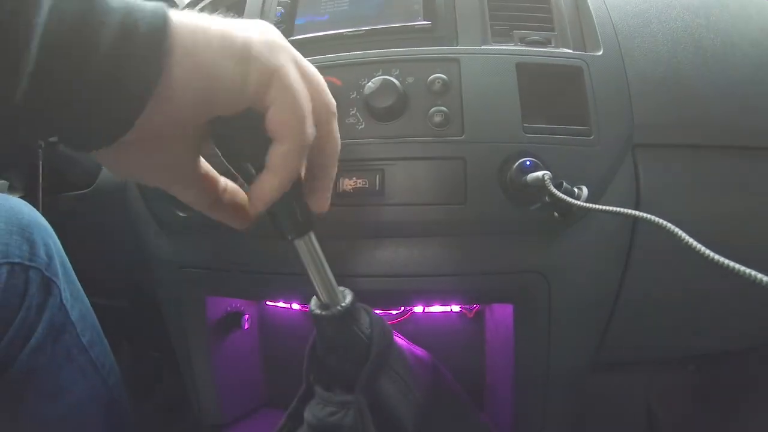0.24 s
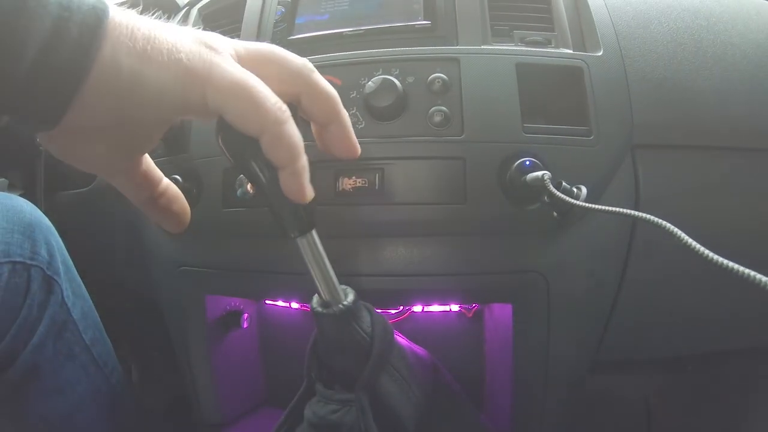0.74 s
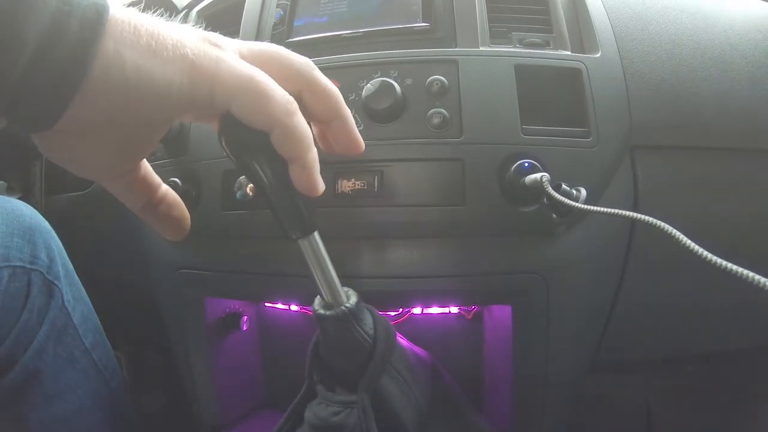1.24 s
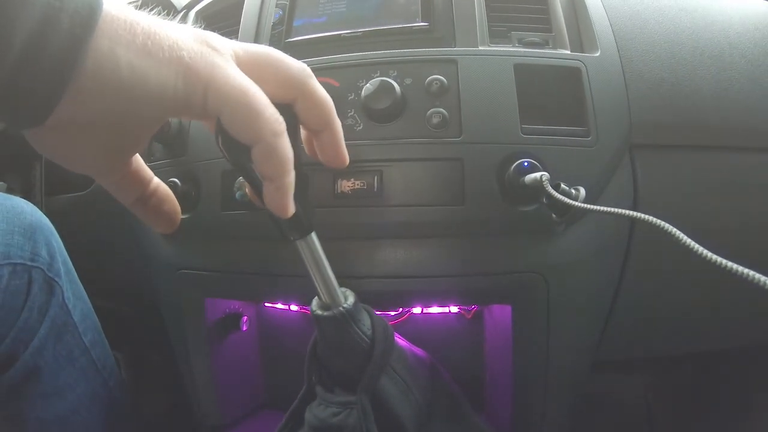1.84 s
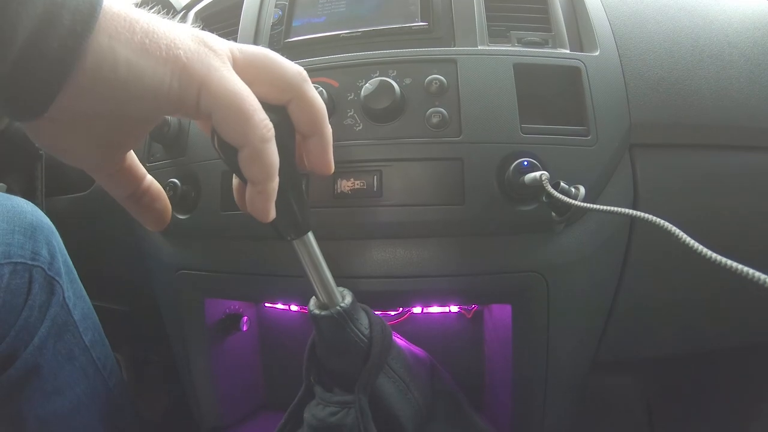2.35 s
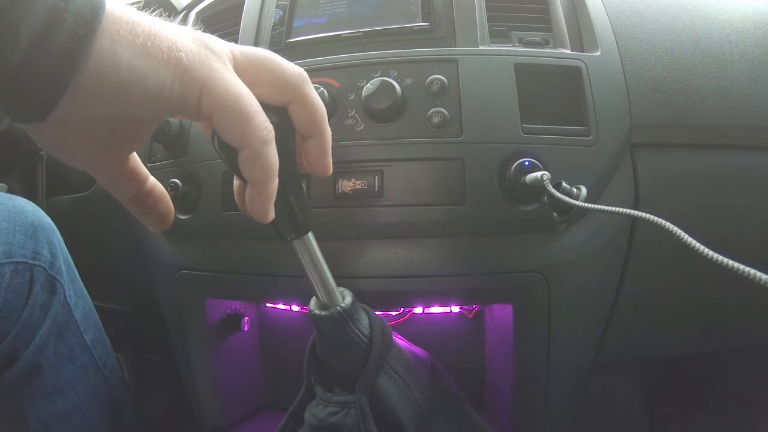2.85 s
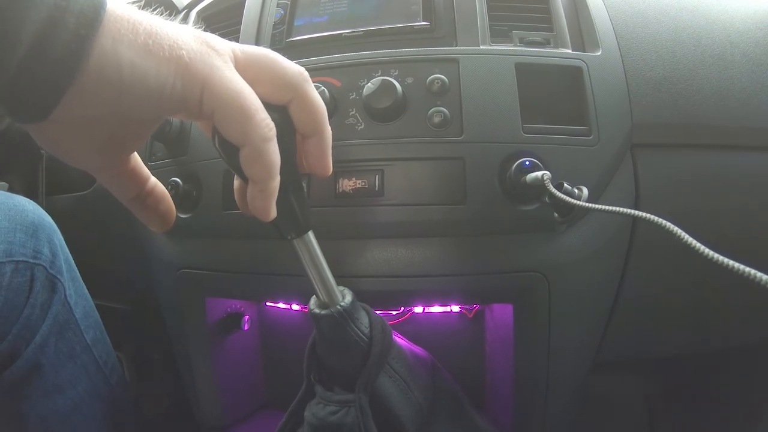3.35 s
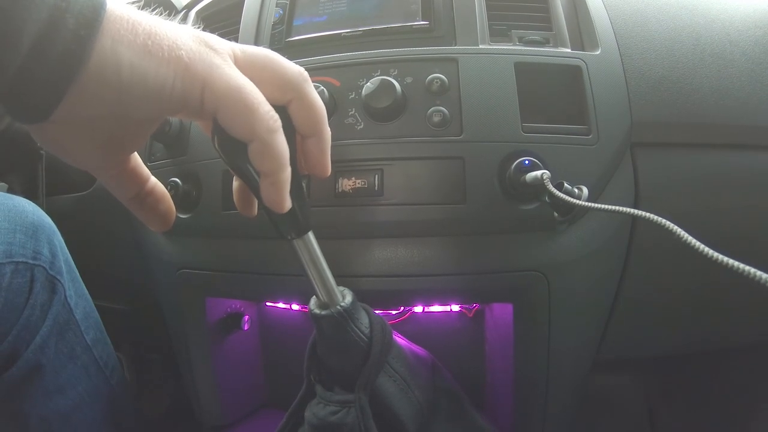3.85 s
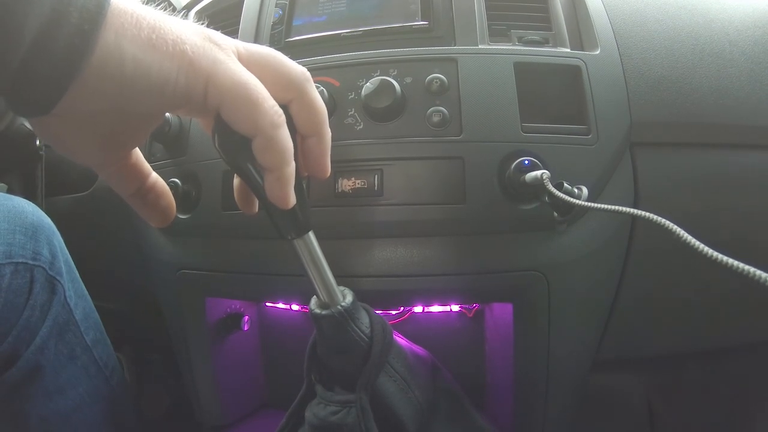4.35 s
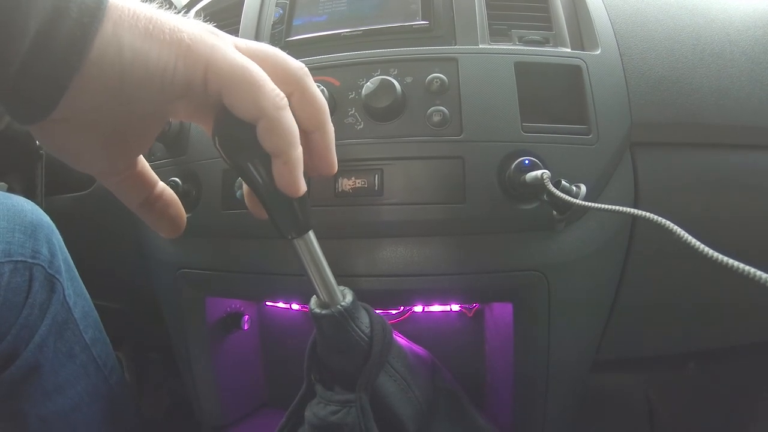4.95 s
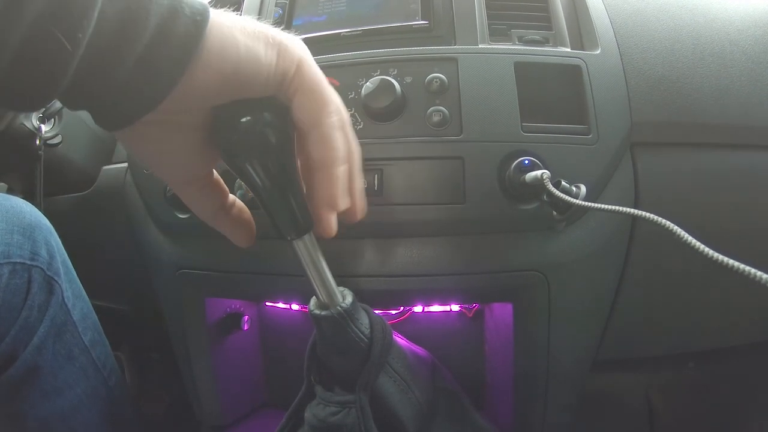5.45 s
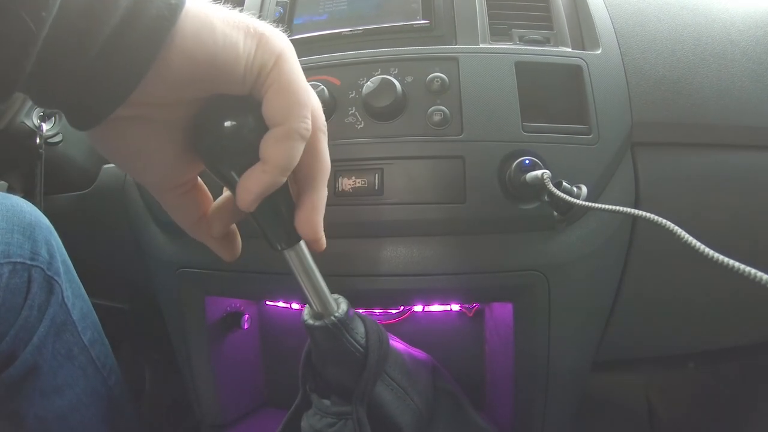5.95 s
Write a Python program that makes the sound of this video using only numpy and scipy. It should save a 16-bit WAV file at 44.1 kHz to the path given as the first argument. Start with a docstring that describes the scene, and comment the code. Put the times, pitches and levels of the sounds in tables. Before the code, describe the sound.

Sharp gearshift knocks, falling diesel revs, a brief rough surge with breathy turbo and lever rattle, then a long low rumbling coast in the cab.

```python
"""A six-cylinder diesel heard from inside the cab of a moving pickup: the clutch comes up after a shift, the
engine pulls briefly while the turbo spools, then the truck coasts. Crank-order tones and pulsing noise make the
engine, moving noise bands the turbo. Tyres drone from noise that repeats each turn and tick once a turn, the cab
booms on one low tone, gears hum, the lever knocks and rattles on its ringing modes, trim buzzes, air hisses past."""
import sys
import numpy as np
from scipy import signal
from scipy.fft import rfft, irfft
from scipy.io import wavfile
from scipy.ndimage import uniform_filter1d

SR = 44100
rng = np.random.default_rng(int(sys.argv[2]) if len(sys.argv) > 2 else 0)


def bounce(signal):
    """Save signal as a 16-bit WAV file at the path given by the first command-line argument."""
    frames = np.transpose(np.atleast_2d(signal))
    limited = np.clip(frames, -1, 1)
    pcm = np.round(limited * 32767).astype(np.int16)
    wavfile.write(sys.argv[1], SR, pcm)


N = 273420
t = np.arange(N) / SR
TOP_HZ = 15700  # the microphone passes nothing much above this

# Engine effort: (time [s], firing throb level [dB], combustion load [dB], 0 = full load)
ENGINE_EFFORT = [(0, -31.5, -23.5), (.2, -27.5, -14), (.38, -28.5, -19), (.48, -37, -19.5),
                 (.65, -32.5, -19), (.85, -28, -16.5), (1.05, -26.5, -8), (1.35, -22, -1),
                 (1.78, -24.5, -1.5), (1.9, -25.5, -16), (2.1, -29, -21), (2.4, -29.5, -16),
                 (2.7, -41, -21), (4.2, -36, -23.5), (6.2, -38.5, -41)]
# Cab panel resonances: (frequency [Hz], width [Hz], boost [dB])
PANEL_MODES = [(1174, 120, 2.5), (2278, 79, 5)]
# Rush of charge air, which the lever rattle follows: (time [s], level [dB])
CHARGE_AIR = [(0, -55), (.4, -66), (.6, -70), (1.0, -52), (1.5, -58), (1.8, -49), (2.15, -50.5), (2.4, -62),
              (2.8, -90)]
# Ringing modes of the gear lever: (frequency [Hz], relative level [dB], 60 dB decay time [s])
LEVER_MODES = [(2305, -1, 0.06), (3007, -10, 0.022), (3990, -14, 0.037), (4520, -12.5, 0.05),
               (5480, -14, 0.027)]


def undb(db):
    """Turn decibels into an amplitude factor."""
    return 10 ** (np.asarray(db) / 20)


def columns(table):
    """Table columns joined by straight lines in time."""
    s, *rest = np.transpose(table)
    return [np.interp(t, s, c) for c in rest]


def unit(x):
    """Scale to rms 1."""
    return x / np.sqrt(np.mean(x ** 2))


def colour(x, shape, peaks=()):
    """Filter to a (frequency [Hz], level [dB]) outline with resonances on top; rms 1."""
    f = np.maximum(np.fft.rfftfreq(len(x), 1 / SR), 1)
    outline_hz, outline_db = np.transpose(shape)
    db = np.interp(np.log(f), np.log(outline_hz), outline_db, left=-120, right=-120)
    for hz, width, boost_db in peaks:
        db = db + boost_db / (1 + (2 * (f - hz) / width) ** 2)
    return unit(irfft(rfft(x) * undb(db), len(x)))


def walk(rate):
    """Wandering random values: drawn rate times a second, held, then smoothed twice; spread near 1."""
    hold = int(SR / rate)
    steps = np.repeat(rng.standard_normal(N // hold + 1), hold)
    return 1.27 * uniform_filter1d(uniform_filter1d(steps, hold), hold)[:N]


def tone(turns, drift=0.076, rate=6):
    """A sine on a running count of cycles, its phase wandering by drift cycles; rms near 1."""
    return np.sqrt(2) * np.sin(2 * np.pi * (turns + rng.random() + drift * walk(rate)))


def breath(hz, spread_hz):
    """Noise in a narrow band around a moving centre; rms 1."""
    at = np.cumsum(spread_hz * np.ones(N)) / SR
    steps = np.arange(int(at[-1]) + 2)
    # a wider band draws its random values faster
    a, b = (np.interp(at, steps, rng.standard_normal(len(steps))) for _ in range(2))
    phase = 2 * np.pi * np.cumsum(hz * np.ones(N)) / SR
    return unit(a * np.cos(phase) + b * np.sin(phase))


def repeating(turns):
    """A fixed random pattern played once a turn; rms 1."""
    size = 4096
    pattern = rng.standard_normal(size)
    return unit(np.interp(turns % 1, np.arange(size) / size, pattern, period=1))


def swells(rows):
    """Bell-shaped rises and falls from (peak [s], rise [s], fall [s], level [dB]) rows."""
    return sum(undb(db) * np.exp(-(2 * (t - s) / np.where(t < s, rise, fall)) ** 2) for s, rise, fall, db in rows)


def half_sine(start, end):
    """A single arch from start to end [s], silent outside."""
    return np.sin(np.pi * np.clip((t - start) / (end - start), 0, 1))


def engine(firing_hz, slip):
    """Crank orders through the mounts; load brings higher orders and a roar that pulses with each firing."""
    # Throb through the mounts: (crank order, relative level [dB])
    throb_orders = [(1, -15.5), (1.5, -17.5), (2, -7.5), (3, -2.5), (4.5, -12)]
    # Orders raised by load: (crank order, level at full load [dB])
    pull_orders = [(6, -19.5), (9, -34.5), (10.5, -30.5), (13, -41.5), (15, -39), (18.5, -40.5),
                   (22.5, -42.5), (26.5, -43.5), (30, -46), (33, -40.5), (35.5, -51), (38, -67),
                   (44, -46.5)]
    # Roar outline: (frequency [Hz], relative level [dB])
    roar_outline = [(120, -43), (200, -8), (223, -20), (376, -15), (494, -22), (581, -24.5), (833, -14),
                    (896, -27.5), (1050, -20), (1950, -32.5), (2290, -33.5), (3230, -42.5), (5260, -38),
                    (9720, -51.5), (15000, -76)]
    throb_db, load_db = columns(ENGINE_EFFORT)
    firings = np.cumsum(firing_hz) / SR
    crank = firings / 3  # six cylinders fire three times a crank turn

    throb = sum(undb(db + 1.2 * walk(8.9)) * tone(k * crank) for k, db in throb_orders)
    # with the clutch down the free-running engine rocks harder and rougher on one order
    rocking = undb(2.2 * walk(23.8)) * tone(9 / 2 * crank, drift=0.11, rate=25)
    throb = throb + 1.5 * (slip - 1) * rocking

    # higher orders waver more
    pull = sum(undb(db + 0.1 * k * walk(14)) * tone(k * crank, drift=0.011 * k, rate=14) for k, db in pull_orders)

    firing_pulse = 1 + 0.33 * np.cos(2 * np.pi * firings)
    # valve gear and knock repeat every two crank turns
    cycle = repeating(crank / 2 + .0004 * walk(12))
    roar = colour(firing_pulse * rng.standard_normal(N) + 0.53 * cycle, roar_outline, PANEL_MODES)
    roar_db = -32 + 0.55 * load_db
    return undb(throb_db) * throb + undb(load_db) * pull + undb(roar_db) * roar


def turbo():
    """A breathy whistle, broadest under load, with a faint octave and a flickering rush of charge air."""
    # Whistle: (time [s], centre frequency [Hz], level [dB])
    whistle_path = [(0, 7860, -68), (.15, 7657, -63), (.3, 7380, -66), (.5, 6800, -68), (.9, 6600, -67),
                    (1.2, 7540, -69), (1.5, 9210, -61), (1.75, 10300, -58.5), (1.9, 10450, -70),
                    (2.3, 8500, -76), (2.45, 7700, -64), (2.7, 6901, -63.5), (3, 6290, -65),
                    (3.5, 5753, -61), (4, 5400, -63), (4.4, 5250, -72.5), (6.2, 5000, -80)]
    # Charge air outline: (frequency [Hz], relative level [dB])
    rush_outline = [(3000, -21.5), (4300, -1), (5300, 0), (6500, -6.5), (8500, -11), (10600, -15.5),
                    (10900, -25), (14000, -30.5)]
    hz, db = columns(whistle_path)
    load = undb(columns(ENGINE_EFFORT)[1])
    spread_hz = .06 * hz + 900 * load
    # the octave sounds only where it stays below the microphone's top
    octave = undb(-23) * (hz < TOP_HZ / 2) * breath(2 * hz, 2 * spread_hz)
    whistle = undb(db + 2.0 * walk(25.03)) * (breath(hz, spread_hz) + octave)
    rush = colour(undb(2.5 * walk(44.5)) * rng.standard_normal(N), rush_outline)
    return whistle + undb(columns(CHARGE_AIR)[0]) * rush


def tyres(wheel):
    """Tread noise repeats every turn over fresh road grain, one tread spot ticks each turn, air hisses past."""
    # Road noise: (time [s], tyre drone level [dB], upper road noise level [dB])
    road_levels = [(0, -26.5, -44.5), (.32, -29.5, -42.5), (.55, -29.5, -46.5), (.8, -29, -43.5),
                   (1.6, -27.5, -38), (2.1, -27.5, -40), (2.35, -30, -45), (3.2, -30.5, -47),
                   (6.2, -31, -46.5)]
    # Outlines of drone, upper road noise and air hiss: (frequency [Hz], relative level [dB])
    drone_outline, upper_outline, hiss_outline = [(41, -47.5), (70, -13), (240, -2.5), (273, -2.5),
                                                  (311, -3), (369, -6.5), (405, -9), (432, -8.5),
                                                  (467, -15), (584, -9.5), (648, -14.5), (711, -10.5),
                                                  (779, -19.5), (1330, -20), (1600, -41), (2080, -30.5),
                                                  (3520, -120)], [(760, -17.5), (1300, -2), (1550, -7),
                                                                 (1750, -6), (1930, -17), (2080, -9.5),
                                                                 (2300, -6.5), (2470, -9), (2830, -13.5),
                                                                 (3240, -17.5), (4520, -18.5),
                                                                 (7520, -26.5), (10800, -41.5),
                                                                 (15600, -42)], [(3000, -1), (7000, 4),
                                                                                (11000, -3.5), (14000, -4),
                                                                                (16000, -10)]
    # Tread tick: (time [s], level [dB])
    tick_levels = [(0, -41), (3, -39.5), (5, -45), (6.2, -52)]
    # Gusts over the steady air hiss: (peak [s], rise [s], fall [s], level [dB])
    gust_rows = [(1.5, .6, .5, -59), (2.13, 0.24, 0.27, -56), (3.8, 0.33, .15, -61.5),
                 (4.6, 0.51, 1.17, -72)]
    drone_db, upper_db = columns(road_levels)

    # two tyres of slightly different girth
    tread = sum(repeating(wheel * girth) for girth in (1, 1.004))
    drone = colour(0.89 * unit(tread) + rng.standard_normal(N), drone_outline, PANEL_MODES)
    upper = colour(undb(0.5 * walk(18)) * rng.standard_normal(N), upper_outline, PANEL_MODES)

    hiss = colour(undb(walk(120)) * rng.standard_normal(N), hiss_outline)
    air = undb(-72.5) + swells(gust_rows)

    turn = wheel % 1
    spot = np.exp(-((turn - .5) / 0.24) ** 2) * undb(1.06 * walk(10))
    # the tread blocks there close up, so the pitch glides upward
    tick = unit(spot * np.sin(2 * np.pi * (66.4 * turn + 4.4 * (turn - .5) ** 2)))
    return undb(drone_db) * drone + undb(upper_db) * upper + air * hiss + undb(columns(tick_levels)[0]) * tick


def cab():
    """The lowest air mode booms over a looser rumble, both lifted by jolts; a low shudder dies away early on."""
    # Bumps in the road that shake the cab: (time [s], boom level [dB])
    jolt_rows = [(.1, -18), (.21, -16), (.34, -22), (.48, -22), (.7, -22), (.86, -22), (.98, -20),
                 (1.09, -21), (1.45, -17.5), (1.6, -22), (1.72, -15.5), (1.9, -19), (1.98, -18.5),
                 (2.25, -21), (2.38, -15), (2.48, -23), (2.68, -17.5), (2.78, -27), (3.05, -22),
                 (3.19, -27), (3.29, -19), (3.39, -17.5), (3.47, -13), (3.56, -14.5), (3.7, -23),
                 (4.0, -20), (4.14, -22), (4.24, -25), (4.4, -19), (4.67, -21), (4.85, -32), (5.1, -24.5),
                 (5.21, -24.5), (5.42, -22), (5.62, -35), (5.79, -24), (5.87, -20.5), (6.13, -18.5)]
    # Rumble outline: (frequency [Hz], relative level [dB])
    rumble_outline = [(4.7, -33), (8.0, -9), (21, -6), (40, 2.5), (52, -0.5), (65, -2.5), (70, -17.5),
                      (110, -16), (140, -40), (240, -120)]
    # A low shudder, strong at the start, dies away by the time the clutch bites:
    # (start [s], end [s], frequency [Hz], level [dB])
    start, end, hz, db = (-0.3, 0.5, 194.5, -33)
    rise_s, fall_s, between_jolts_db = 0.06, 0.073, -27.5
    shake = undb(between_jolts_db) + swells([(s, rise_s, fall_s, jolt_db) for s, jolt_db in jolt_rows])
    boom = tone(34.27 * t, drift=0.29, rate=9)
    rumble = colour(rng.standard_normal(N), rumble_outline)
    rumble_db = -26 - 0.84 * t - 0.5 * walk(9.0)  # fades slowly and wavers
    shudder = undb(db) * half_sine(start, end) * tone(hz * t)
    return shake * boom + (undb(rumble_db) + 0.18 * shake) * rumble + shudder


def gears(firing_hz, wheel):
    """A mesh hum at four times the road-matched firing rate, split into neighbours by the turning wheels."""
    # Gear hum: (time [s], level [dB])
    hum_levels = [(0, -41), (.8, -43), (1.3, -35.5), (2.3, -34.5), (5.2, -45.5)]
    # Lines around the mesh: (wheel orders off the mesh line, relative level [dB])
    side_lines = [(-1, -10.5), (0, -3), (1, -2.5), (2, -10)]
    mesh = 4 * np.cumsum(firing_hz) / SR
    hum = sum(undb(db + 3.5 * walk(2.99)) * tone(mesh + k * wheel) for k, db in side_lines)
    return undb(columns(hum_levels)[0]) * hum


def trim():
    """Narrow noise bands flicker as buzzes that come and go."""
    # Trim buzzing while a hand rests on or grips the lever:
    # (start [s], end [s], centre frequency [Hz], spread [Hz], level [dB])
    buzz_rows = [(.8, 5.7, 2290, 140, -56.5), (1.36, 2.2, 4550, 600, -60), (5.1, 6.3, 4620, 500, -63),
                 (5.5, 6.3, 3300, 1100, -60), (-.1, .45, 3300, 1500, -58), (0.62, 5.2, 5220, 380, -64.5),
                 (0.27, 5.3, 3810, 250, -65.5)]
    out = np.zeros(N)
    for start, end, hz, spread_hz, db in buzz_rows:
        fade = np.clip(np.minimum(t - start, end - t) / 0.09, 0, 1)
        out += undb(db + 3.0 * walk(30)) * fade * breath(hz, spread_hz)
    return out


def lever():
    """Each knock is a noise snap that rings the lever modes near its pitch; the boot squeaks in short bursts."""
    # Knocks: (time [s], level [dB], snap pitch [Hz], snap 60 dB decay time [s])
    knock_rows = [(.0114, -21.5, 3700, .03), (.1729, -25.5, 5400, .016), (.256, -40, 4500, .039),
                  (.2818, -35, 4300, .04), (.298, -38, 4500, .04), (.3107, -34, 4500, .05),
                  (.323, -38.5, 4700, .049), (.7811, -41, 5300, .033), (1.0222, -35, 4700, .033),
                  (1.4695, -38.5, 4500, .03), (1.819, -35, 5020, .04), (1.863, -34, 5000, .04),
                  (1.9091, -35, 5000, .04), (1.974, -30, 5000, .021), (1.9891, -33, 5200, .024),
                  (2.2799, -37, 2292, .02), (4.4703, -43, 5193, .03), (5.5822, -45, 3000, .03),
                  (5.9957, -43, 3500, .03)]
    # Boot squeaks: (start [s], end [s], frequency [Hz], level [dB])
    squeak_rows = [(0.01, 0.05, 2259, -39), (0.051, 0.076, 2195, -39.5), (0.089, 0.111, 2250, -47.5)]
    out = np.zeros(N)
    u = np.arange(int(.1 * SR)) / SR
    for s, db, hz, t60 in knock_rows:
        width_hz = 42 / t60  # the shorter the snap, the broader
        band = [max(hz - width_hz, 0.31 * hz), hz + .5 * width_hz]
        burst = rng.standard_normal(len(u)) * 1e-3 ** (u / t60)
        snap = signal.sosfilt(signal.butter(3, band, "band", fs=SR, output="sos"), burst)
        # modes weaken by 10 dB an octave away from the snap
        ring = sum(undb(g - 10 * abs(np.log2(f / hz))) * np.sin(2 * np.pi * f * u) * 1e-3 ** (u / d)
                   for f, g, d in LEVER_MODES)
        first = int(s * SR)
        hit = (snap / np.abs(snap).max() + ring)[:N - first]
        out[first:first + len(hit)] += undb(db) * hit
    for start, end, hz, db in squeak_rows:
        squeak = half_sine(start, end) ** .5 * tone(hz * t, drift=0.38, rate=93.0)
        out += undb(db + 1.53 * walk(90)) * squeak
    return out


def rattle():
    """Random taps ring the loose lever's modes, loudest while the charge air rushes."""
    taps_a_s, scatter_db, floor_db = 45, 4.0, -63
    u = np.arange(int(.06 * SR)) / SR
    chance = rng.random((2, N))
    # most taps are near the softest level, a few come out far stronger
    taps = (chance[0] < taps_a_s / SR) * undb(-scatter_db * np.log(1 - chance[1]))
    ring = sum(undb(.5 * g) * np.sin(2 * np.pi * f * u) * 1e-3 ** (u / d) for f, g, d in LEVER_MODES)
    chatter = unit(signal.fftconvolve(taps, ring)[:N])
    level = undb(floor_db) + undb(columns(CHARGE_AIR)[0] - 3)
    return level * chatter


def scene():
    """Road speed and clutch slip drive the engine, wheels and gears; all sources add up at one microphone."""
    # Road speed: (time [s], firing rate that matches it in this gear [Hz])
    road_speed = [(0, 91.53), (.5, 91.83), (.9, 92.43), (1.15, 93.43), (1.45, 94.6), (1.75, 95.32),
                  (2.05, 94.97), (2.65, 94.64), (3.5, 92.53), (4.4, 90.84), (5.2, 88.9), (6.2, 86.48)]
    # Revs fall until the clutch bites: (time [s], engine speed over road speed)
    clutch_slip = [(0, 1.32), (.15, 1.25), (.33, 1.15), (.45, 1.04), (.52, 1.0)]
    road_hz, slip = columns(road_speed)[0], columns(clutch_slip)[0]
    firings_a_wheel_turn, start_turn = 10.335, .19 + .5
    wheel = np.cumsum(road_hz) / SR / firings_a_wheel_turn + start_turn
    mix = engine(road_hz * slip, slip) + turbo() + tyres(wheel) + cab()
    mix = mix + gears(road_hz, wheel) + trim() + lever() + rattle()
    return mix[None]


def record(dry):
    """The camera microphone cuts the top with a steep low-pass."""
    return signal.sosfilt(signal.ellip(10, .2, 60, TOP_HZ, fs=SR, output="sos"), dry)


dry = scene()
out = record(dry)
bounce(out)
```